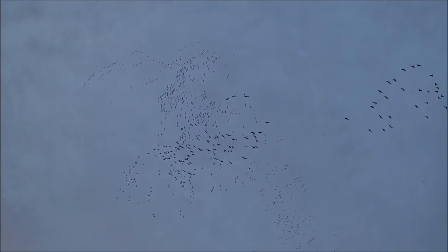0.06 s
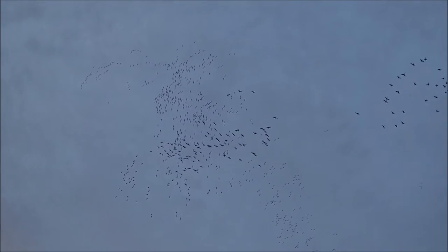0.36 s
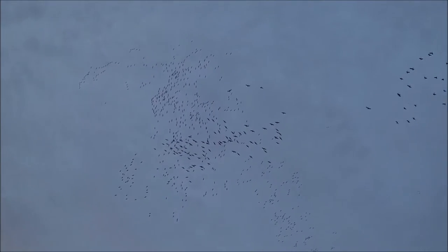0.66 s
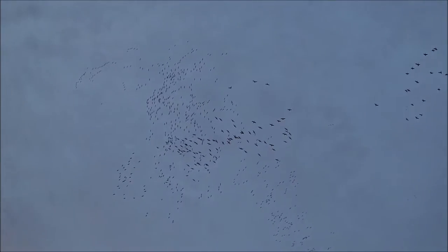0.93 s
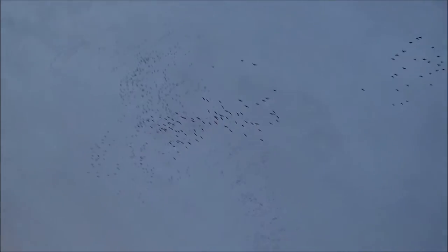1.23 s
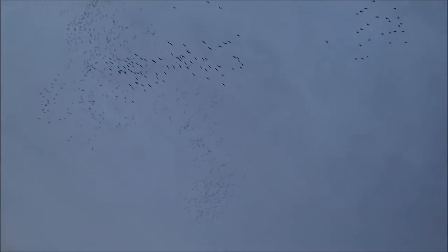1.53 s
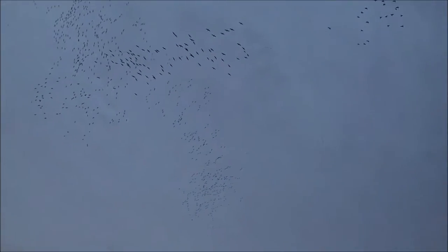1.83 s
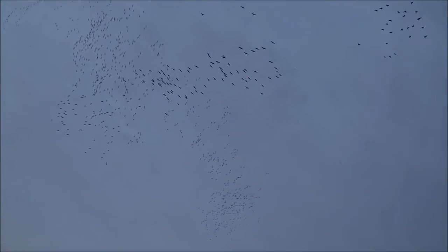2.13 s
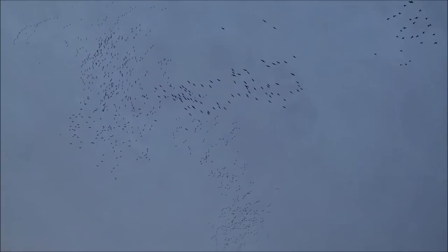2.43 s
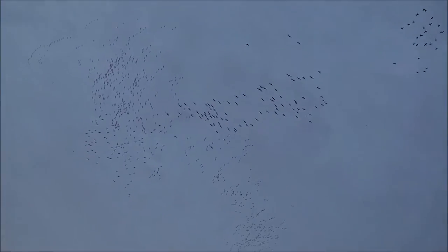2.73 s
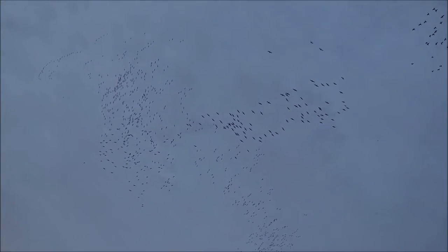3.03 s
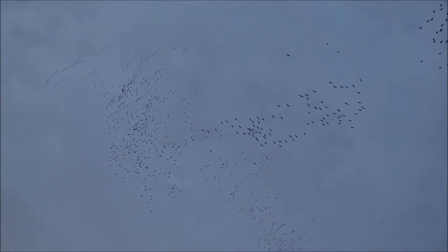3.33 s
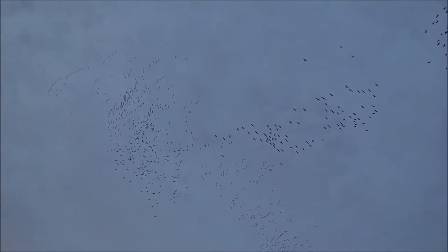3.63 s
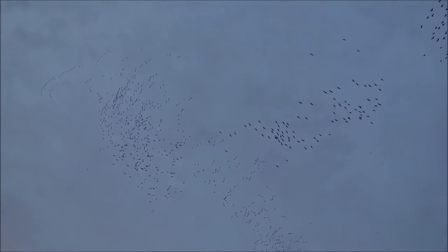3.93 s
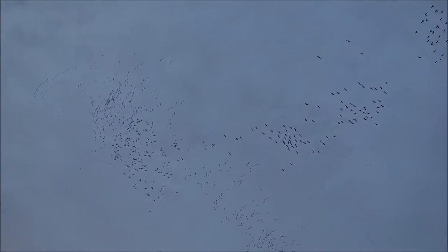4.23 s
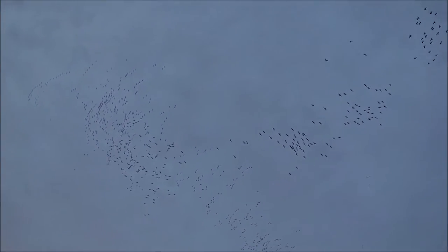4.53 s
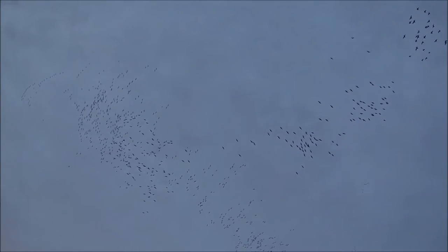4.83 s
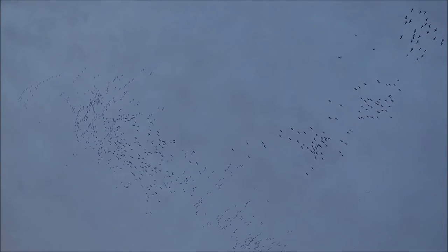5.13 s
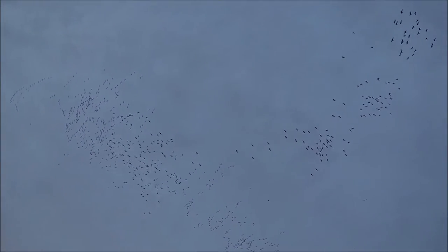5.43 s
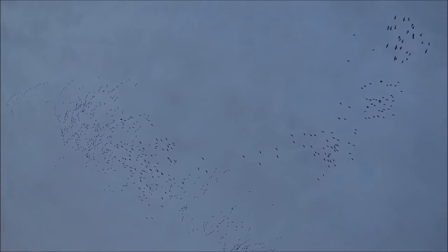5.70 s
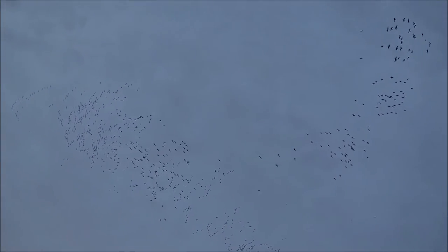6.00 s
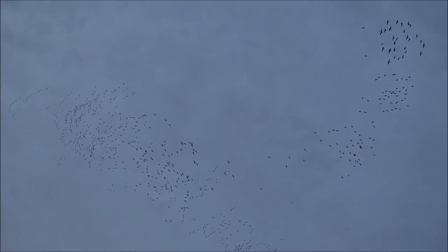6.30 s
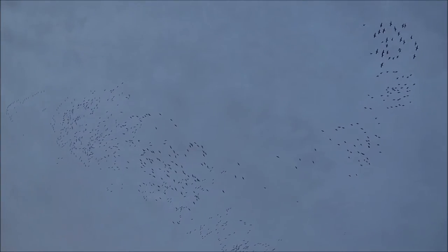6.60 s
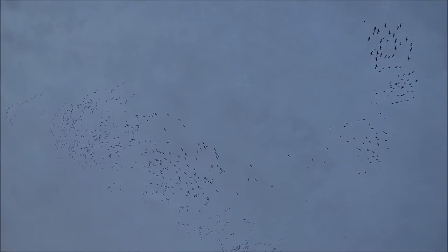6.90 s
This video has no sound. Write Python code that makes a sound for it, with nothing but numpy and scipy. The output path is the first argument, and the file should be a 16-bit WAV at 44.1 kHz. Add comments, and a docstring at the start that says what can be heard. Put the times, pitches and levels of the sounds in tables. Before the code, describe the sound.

A large flock of geese calls high over open country for the whole seven seconds. Hundreds of distant birds, with low and high voices, blur into a dense, flickering chorus. Nearer geese cut through with short, high, arching honks, about ten a second, irregular and often overlapping. Quieter thin yelps, hoarse cackles and harsh squawks are scattered among them, all with a soft, dull echo off the fields. The calling holds a fairly even level and never pauses. Underneath, wind makes a low rumble on the microphone. It buffets hardest from about 1.1 to 1.5 seconds, with smaller gusts near 2.6 seconds, brief bumps at about 3.3 and 4.2 seconds, and a mild gust near 4.7 seconds. After 5 seconds the wind settles to a light rumble while the geese carry on. A very faint hiss and thin electronic whine lie behind everything.

```python
"""A big flock of snow geese passes high over open country, all calling at once.
Each call is the buzz of a syrinx. Hundreds of far birds, low and high voiced, blur into a chorus;
the nearest cut through with thin yelps, short arched honks, hoarse cackles and harsh squawks,
echoing softly off the fields. Wind buffets the microphone, whose electronics hiss and whine
faintly."""
import sys
import numpy as np
from scipy import signal
from scipy.fft import rfft, irfft, next_fast_len
from scipy.io import wavfile
from scipy.ndimage import uniform_filter1d

SR = 44100
rng = np.random.default_rng(int(sys.argv[2]) if len(sys.argv) > 2 else 0)


def master(y):
    """Save y as 16-bit WAV."""
    cut = np.clip(np.atleast_2d(y).T, -1, 1)
    pcm = np.round(cut * 32767)  # scale
    wavfile.write(sys.argv[1], SR, pcm.astype(np.int16))


N = 306936


def from_db(db):
    """Decibels to gain."""
    return 10 ** (np.asarray(db) / 20)


def rms_one(x):
    """Scale to rms 1."""
    return x / np.sqrt(np.mean(x ** 2) + 1e-20)


def fader(curve, trim_db):
    """Gain at every sample from (t/s, level/dB) breakpoints and a trim."""
    times, level_db = np.transpose(curve)
    return from_db(np.interp(np.arange(N) / SR, times, level_db) + trim_db)


def eq(x, curve):
    """Filter by (f/Hz, level/dB) points on a log axis, rolling off steeply past the last."""
    size = next_fast_len(N + SR // 10)
    bins = rfft(x, size)
    hz = np.arange(len(bins)) * SR / size
    point_hz, point_db = np.transpose(curve)
    gain = from_db(np.interp(np.log(np.maximum(hz, 1)), np.log(point_hz), point_db))
    rolloff = np.maximum(hz / point_hz[-1], 1) ** -6
    return irfft(bins * gain * rolloff, size)[:N]


def drift(rate):
    """Smooth random modulator of rms 1, changing about `rate` times a second."""
    pole = np.exp(-40 * np.pi * rate / SR)
    noise = rng.standard_normal(N // 20 + 4002)  # one value per 20 samples
    slow = signal.lfilter([1], [1, -2 * pole, pole * pole], noise)[4000:]
    return np.interp(np.arange(N) / 20, np.arange(len(slow)), rms_one(slow))


def levelled(x, window_s):
    """Hold a sound near rms 1 over the window, keeping its faster flutter."""
    size = max(int(window_s * SR), 2)
    power = uniform_filter1d(uniform_filter1d(x * x, size), size)
    return x / np.sqrt(np.abs(power) + 1e-12)


def arch(start, length, scoop, droop, swell, crest):
    """One call's sample indices, pitch bend (scoops up, then droops) and swelling envelope."""
    first, count = int(start * SR), max(int(length * SR), 2)
    at = np.arange(max(first, 0), min(first + count, N))
    progress = (at - first) / count
    bend = 1 - np.where(progress < .5, scoop, droop) * (2 * progress - 1) ** 2
    effort = np.interp(progress, [0, np.clip(crest, .22, .85), 1], [0, .5, 1])
    return at, bend, np.abs(np.sin(np.pi * effort)) ** swell


def syrinx_crowd(count, pitch_hz, spread_octaves, length_s, bend_share, spread_db, jitter):
    """Pulse trains of many buzzing syrinxes, each call with its own pitch, arch and distance."""
    out, waver = np.zeros(N), 1 + jitter * drift(110)
    for when, scoop, droop, stretch, voice, nearness in rng.random((count, 6)):
        start = when * (N / SR + length_s) - length_s
        at, bend, envelope = arch(start, length_s * (.5 + stretch), 2 * bend_share * scoop,
                                  2 * bend_share * droop, swell=1, crest=.35)
        hz = pitch_hz * 2 ** (spread_octaves * (2 * voice - 1))
        own_waver = waver[at - int(nearness * N)]
        half_phase = np.pi * (np.cumsum(hz * bend * own_waver) / SR + scoop)
        harmonics = int(6500 / hz)
        pulses = np.sin((2 * harmonics + 1) * half_phase) / (np.sin(half_phase) + 1e-12) - 1
        out[at] += from_db(spread_db * nearness ** 2) * envelope * pulses  # few birds are close
    return rms_one(out)


# Tone colour of the distant flock, one EQ per chorus band: f/Hz, level/dB
FUNDAMENTAL_EQ = [(300, -36), (470, -10.5), (560, -11.5), (640, 0), (720, -7), (800, -28.5), (950, -35)]
LOW_VOICES_EQ = [(600, -34.5), (770, -8.5), (850, 1.5), (960, 3.5), (1080, -3), (1270, 6), (1450, -1),
                 (1900, -14.5), (2400, -15.5), (3200, -45.5)]
HIGH_VOICES_EQ = [(500, -41.5), (1100, -30), (1250, 0), (1380, 7), (1480, -6.5), (1600, -12), (1750, -20),
                  (2100, -36), (3000, -60)]
OVERTONE_EQ = [(1450, -36), (1750, -9.5), (1870, 0), (2020, -0.5), (2220, -14), (2400, -6.5), (2650, -25.5),
               (2860, -12), (3100, -42.5), (5000, -70)]
SHRILL_EQ = [(2400, -32), (3000, 1.5), (3200, -7.5), (3420, -3.5), (3650, -4), (4000, -3), (4500, -14),
             (5200, -15.5), (7000, -21.5)]
# Fader rides of the same five bands, before trim: t/s, level/dB
FUNDAMENTAL_RIDE = [(0.0, -57), (0.08, -46.5), (0.13, -46.5), (1.72, -52), (2.19, -46), (2.23, -59.5),
                    (2.79, -50), (4.25, -52.5), (4.3, -48), (4.32, -58), (4.57, -42), (4.73, -44),
                    (5.06, -56), (5.23, -45), (5.27, -52), (6.11, -54.5), (6.57, -58), (6.96, -56.5)]
LOW_RIDE = [(0, -42), (.09, -49), (.35, -50), (.68, -49), (.82, -60), (.88, -44.5), (1.08, -47.5),
            (1.13, -57), (1.3, -46.5), (1.479, -61), (1.6, -50.5), (2.0, -47.5), (2.14, -57), (2.45, -49),
            (2.7, -48.5), (3.05, -51), (3.6, -47.5), (3.95, -56), (4.15, -48), (4.7, -47.5), (4.83, -49),
            (5.0, -48), (5.13, -53), (5.3, -46.5), (5.52, -47), (5.9, -45.5), (6.3, -44.5), (6.47, -49),
            (6.6, -46), (6.96, -49)]
HIGH_RIDE = [(0, -34.5), (.2, -36.5), (.32, -39.5), (.55, -35.5), (.63, -43.5), (.74, -29.5), (.82, -38),
             (.93, -37.5), (1.2, -38), (1.299, -46), (1.4, -31.5), (1.72, -36.5), (1.79, -36.5),
             (1.97, -30.5), (2.02, -32), (2.22, -43), (2.451, -35), (2.51, -40), (2.6, -48), (2.65, -38),
             (2.8, -36), (2.98, -33), (3.12, -35), (3.4, -35), (3.48, -42.5), (3.65, -32), (3.96, -35.5),
             (4.02, -33.5), (4.24, -33), (4.33, -41), (4.411, -37), (4.47, -46), (4.63, -35.5),
             (4.82, -32.5), (4.99, -29.5), (5.06, -37.5), (5.22, -36), (5.4, -34), (5.45, -44), (5.54, -50),
             (5.62, -36.5), (5.83, -32), (5.89, -48), (5.98, -35.5), (6.1, -33), (6.2, -35), (6.3, -35.5),
             (6.39, -37), (6.52, -33.5), (6.739, -32), (6.8, -40.5), (6.96, -24.5)]
OVERTONE_RIDE = [(0.0, -49), (0.35, -48.5), (0.73, -53), (0.91, -50), (2.02, -48.5), (2.13, -49),
                 (2.25, -51.5), (2.52, -49.5), (2.66, -49), (2.87, -51), (3.04, -47.5), (3.16, -49),
                 (3.37, -52.5), (3.59, -51), (3.76, -46.5), (3.99, -49.5), (4.19, -49.5), (4.48, -48.5),
                 (4.81, -43.5), (4.98, -47.5), (5.43, -50), (5.68, -53.5), (6.45, -47), (6.65, -54.5),
                 (6.78, -46.5), (6.96, -49)]
SHRILL_RIDE = [(0.04, -60), (0.76, -63), (0.942, -59), (0.96, -63), (1.588, -64), (2.52, -64),
               (2.58, -60.5), (2.66, -67.5), (3.21, -59), (3.48, -70), (3.56, -62.5), (4.97, -59.5),
               (5.051, -70), (5.28, -63), (5.9, -64.5), (5.939, -67), (6.04, -65), (6.9, -62)]


def distant_chorus():
    """The bed: low calls, and high calls from fundamental to shrill top, each band on its own fader."""
    def band(calls, colour, wash, window_s):
        """Separate calls over the noise wash of the farthest birds, in one tone colour."""
        return levelled(eq(calls + wash * rng.standard_normal(N), colour), window_s)

    low = syrinx_crowd(count=280, pitch_hz=403.5, spread_octaves=.42, length_s=.11,
                       bend_share=.072, spread_db=14, jitter=.013)
    high = syrinx_crowd(count=420, pitch_hz=708, spread_octaves=.38, length_s=.09,
                        bend_share=.08074, spread_db=6.5, jitter=.0062)
    return (fader(FUNDAMENTAL_RIDE, trim_db=-2) * band(high, FUNDAMENTAL_EQ, wash=.6, window_s=.092)
            + fader(LOW_RIDE, trim_db=5) * band(low, LOW_VOICES_EQ, wash=.6, window_s=.1)
            + fader(HIGH_RIDE, trim_db=-3) * band(high, HIGH_VOICES_EQ, wash=.35, window_s=.093)
            + fader(OVERTONE_RIDE, trim_db=-2.5) * band(high, OVERTONE_EQ, wash=.35, window_s=.09)
            + fader(SHRILL_RIDE, trim_db=-7) * band(high, SHRILL_EQ, wash=1, window_s=.42))


# Spectra of small eddies (rumble) and big, slow ones (buffet): f/Hz, relative level/dB
RUMBLE_EQ = [(15, -8), (45, 3.5), (68, -1), (80, -9), (115, -17), (160, -34), (300, -39.5)]
BUFFET_EQ = [(8, -3), (18, 10), (30, -3), (48, -16), (70, -31), (150, -56)]
# Gusts over the steady breeze: t/s, hold/s, big-eddy level/dB, small-eddy level/dB
GUSTS = [(0.064, 0.2, -1.5, 5), (1.117, 0.13, 22.5, 9), (1.349, 0.064, 18, 2), (1.46, 0.046, 18, 2.5),
         (1.75, 0.037, 9.5, -5), (1.926, .03, 9.5, 0.5), (2.61, 0.23, 6, 3), (3.309, 0.011, 14, 9.5),
         (3.81, 0.43, 3.5, 1.5), (4.237, 0.017, 13, 13.5), (4.684, 0.29, 7, 2.5)]


def wind():
    """Eddies rumble on the microphone port; in strong gusts the big, slow ones tend to grow most."""
    attack_s, release_s = .038, .092
    t = np.arange(N) / SR
    big_db, small_db = np.zeros(N), np.zeros(N)
    for start, hold, big_peak_db, small_peak_db in GUSTS:
        envelope = np.interp(t - start, [-attack_s, 0, hold, hold + release_s], [0, 1, 1, 0])
        big_db = np.maximum(big_db, big_peak_db * envelope)
        small_db = np.maximum(small_db, small_peak_db * envelope)
    rumble = levelled(eq(rng.standard_normal(N), RUMBLE_EQ), window_s=.31)
    buffet = levelled(eq(rng.standard_normal(N), BUFFET_EQ), window_s=.08)
    return from_db(small_db - 45) * rumble + from_db(big_db - 41) * buffet


# Noise floor of open air and microphone: f/Hz, level/dB per Hz
HISS_EQ = [(60, -84.5), (200, -88), (290, -91.5), (360, -88), (470, -92.5), (1500, -100), (4000, -112),
           (7000, -116), (8700, -113), (10800, -121), (11400, -115), (12300, -113), (13700, -125),
           (15000, -122)]
# Tones of the electronics: f/Hz, rms level/dB
WHINE_TONES = [(12258, -84), (12288, -84.5), (11400, -101), (5660, -97)]


def hiss_and_whine():
    """Open air and microphone hiss, with the thin wavering whine of the electronics."""
    out = eq(rng.standard_normal(N), HISS_EQ) * np.sqrt(SR / 2)
    for hz, level_db in WHINE_TONES:
        phase = 2 * np.pi * np.cumsum(hz + 4 * drift(13)) / SR
        out += from_db(level_db) * np.sqrt(2) * np.sin(phase)
    return out


# Thin, shrill yelps: t/s, length/s, top f/Hz, arch/share of pitch,
# then relative level/dB of the body (harmonics 1-4), of harmonic 5 and of harmonic 6
YELPS = [(0.06, 0.125, 850, 0.12, -51.5, -64, -74), (0.411, 0.18, 867, 0.09, -53, -66, -77),
         (0.794, 0.15, 838, 0.14, -46.5, -62.5, -77), (1.393, 0.13, 864, 0.13, -53, -69, -75),
         (1.53, 0.087, 858, 0.042, -43.5, -67.0, -83.0), (1.599, 0.11, 842.0, 0.11, -53, -61.0, -78.5),
         (1.906, 0.14, 846, 0.14, -62, -72, -83.5), (2.266, 0.12, 841, 0.11, -50.5, -62, -78.5),
         (3.15, 0.15, 876, 0.09, -55, -67.5, -83.0), (3.16, 0.22, 797, 0.094, -60, -75, -72.5),
         (3.781, 0.14, 864, 0.17, -49, -74.5, -74), (4.43, 0.081, 844, 0.084, -47.5, -81, -86),
         (4.696, 0.19, 849, 0.09, -55, -68, -79), (5.279, 0.15, 857, 0.15, -52.5, -64.5, -79.0),
         (5.602, 0.088, 805, 0.13, -63, -71.0, -70), (6.537, 0.117, 871.0, 0.12, -56, -63.5, -71)]
# Harmonics 1-4 against the yelp's body: level/dB
YELP_BODY_DB = [-2, 1, -1, -16]


def yelps():
    """High voices: low harmonics sound near the top of the pitch arch, shrill ones trace all of it."""
    out, waver = np.zeros(N), 1 + .008 * drift(30)
    flutter_db = np.array([4 * drift(50) for _ in range(6)])
    grit = np.array([.12 * drift(160) for _ in range(6)])  # uneven cycles smear the top most
    harmonic = np.arange(1, 7)[:, None]
    swell = np.where(harmonic <= 4, .9, .5)
    for start, length, top_hz, arch_share, body_db, fifth_db, sixth_db in YELPS:
        at, bend, envelope = arch(start, length, arch_share, arch_share, swell=.68, crest=.55)
        levels_db = np.array([*(body_db + np.array(YELP_BODY_DB)), fifth_db, sixth_db])[:, None]
        gains = from_db(levels_db + flutter_db[:, at]) * envelope ** swell
        phase = 2 * np.pi * np.cumsum(top_hz * bend * waver[at]) / SR
        out[at] += np.sum(gains * np.sin(harmonic * (phase + grit[:, at])), axis=0)
    return out


# The nearest honks: t/s, length/s, top f/Hz, upward tilt of the arch/share of pitch,
# relative level/dB of harmonics 2, 3, 4 and 5, crest of the swell/share of length
HONKS = [(0.061, 0.077, 679.0, -0.1, -29.5, -49, -69, -80.0, 0.18),
         (0.105, 0.14, 654.6, -0.0019, -31, -57, -71, -80.0, 0.15),
         (0.26, 0.04, 699, 0.051, -32, -48.0, -70.0, -80.0, 0.15),
         (0.353, 0.047, 694.0, 0.083, -37.5, -54, -67, -80.0, 0.84),
         (0.51, 0.11, 696.0, 0.024, -33.5, -56, -69, -84, 0.15),
         (0.681, 0.119, 644.0, -0.05, -31.5, -41, -59, -76, 0.54),
         (0.852, 0.073, 702, 0.058, -30, -58.0, -58, -70, 0.17),
         (0.938, 0.045, 673, 0.04, -38, -50, -70.0, -81, 0.15),
         (0.99, 0.06, 670, 0.045, -50, -38, -70.0, -79.0, 0.85),
         (1.052, 0.031, 659, 0.057, -28, -45, -64, -79, 0.15),
         (1.089, 0.094, 679, 0.076, -30.5, -41.5, -71, -78, 0.15),
         (1.261, 0.098, 672, -0.045, -35, -41, -69, -79, 0.42),
         (1.434, 0.13, 701, -0.077, -24.5, -38.5, -64, -63, 0.47),
         (1.603, 0.046, 696.0, 0.052, -22.0, -62, -76, -74, 0.15),
         (1.653, 0.033, 667, -0.0039, -30.5, -51.0, -71, -72, 0.26),
         (1.807, 0.057, 703, -0.043, -24.5, -42, -53.5, -66, 0.48),
         (1.866, 0.082, 657, -0.01, -42, -36.0, -55, -79, 0.53),
         (1.922, 0.068, 735, 0.076, -30.0, -60, -64, -82, 0.15),
         (2.027, 0.11, 702, -0.09, -30, -39, -62.0, -70, 0.91),
         (2.094, 0.13, 687.5, -0.065, -24, -51, -62, -81, 0.82),
         (2.124, 0.073, 687.0, 0.035, -36.5, -42, -70.0, -61, 0.15),
         (2.279, 0.081, 960, -0.078, -34.5, -57, -70.0, -77, 0.13),
         (2.37, 0.044, 722, 0.086, -28, -43.0, -58.0, -69, 0.15),
         (2.42, 0.093, 740, -0.09, -37.0, -41.5, -66.0, -71, 0.46),
         (2.529, 0.11, 702, 0.039, -31.5, -41, -52, -70.0, 0.69),
         (2.64, 0.056, 690, -0.04, -39, -58.0, -63, -84, 0.15),
         (2.756, 0.027, 640, -0.02, -28.5, -47.5, -55, -80, 0.15),
         (2.831, 0.084, 676, 0.016, -24, -41.5, -71, -64.5, 0.4),
         (2.894, 0.114, 698.5, -0.1, -31, -39.5, -56.5, -81, 0.7),
         (2.979, 0.078, 708, -0.028, -33.5, -53, -59, -81, 0.15),
         (3.043, 0.091, 681, 0.048, -30, -38.5, -72, -60.0, 0.44),
         (3.144, 0.037, 666.4, 0.059, -21, -58.0, -66, -61.5, 0.8),
         (3.187, 0.069, 662, -0.07, -34.5, -44.5, -72, -70.5, 0.15),
         (3.287, 0.054, 696.0, 0.09, -26.0, -49, -63, -81, 0.84),
         (3.326, 0.13, 634, -0.079, -30, -50.0, -69, -74, 0.84),
         (3.502, 0.038, 638, -0.094, -28.5, -55, -70.0, -77.0, 0.85),
         (3.576, 0.032, 704.0, 0.083, -26.5, -51, -62, -67, 0.5),
         (3.612, 0.068, 659, -0.018, -31.5, -44, -65.0, -63, 0.15),
         (3.739, 0.035, 669, 0.013, -22, -42.5, -70.0, -78, 0.84),
         (3.79, 0.09, 692.0, -0.08, -31, -40.5, -57, -65, 0.16),
         (3.864, 0.055, 689, -0.047, -24, -55, -66, -74.0, 0.29),
         (3.937, 0.05, 736.5, -0.032, -35, -41, -64.0, -73, 0.16),
         (4.028, 0.07, 697.6, 0.078, -28, -36.5, -53.5, -81, 0.15),
         (4.09, 0.074, 679, -0.061, -29.5, -36.0, -58, -79, 0.16),
         (4.157, 0.025, 677.4, 0.038, -24, -41, -56, -79, 0.85),
         (4.211, 0.13, 755, -0.047, -34.5, -46.5, -61, -78, 0.16),
         (4.347, 0.1, 685.0, 0.051, -34, -44, -65, -80.0, 0.96),
         (4.493, 0.052, 689.0, 0.018, -44.0, -52, -66, -65, 0.14),
         (4.661, 0.085, 651, -0.012, -43.5, -36, -68, -75, 0.26),
         (4.648, 0.136, 623, 0.038, -38.5, -56, -72, -66.5, 0.28),
         (4.742, 0.14, 691, 0.089, -28.0, -49, -60, -72, 0.32),
         (4.862, 0.182, 679.0, -0.02, -28, -46, -69.0, -69, 0.52),
         (5.062, 0.14, 710, 0.03, -29, -40, -57.0, -83, 0.48),
         (5.172, 0.091, 704, 0.063, -30.5, -58.0, -66.0, -80.0, 0.85),
         (5.195, 0.046, 640, 0.016, -29.5, -55, -71, -80.0, 0.85),
         (5.256, 0.043, 692, -0.096, -23, -51, -60, -68, 0.85),
         (5.291, 0.041, 632, -0.031, -27.5, -50.5, -72, -70, 0.15),
         (5.351, 0.071, 650.0, 0.02, -31, -49, -67, -71.0, 0.73),
         (5.562, 0.079, 678.6, -0.041, -32.5, -56, -70.0, -70, 0.78),
         (5.7, 0.12, 623.6, -0.048, -35, -52, -50, -79, 1),
         (5.78, 0.092, 651, 0.01, -39.5, -38, -71, -80.0, 0.69),
         (5.924, 0.085, 754, 0.034, -35, -44.5, -56, -71, 0.15),
         (6.064, 0.13, 699, 0.053, -30, -46.5, -64, -64.0, 0.78),
         (6.146, 0.074, 635, 0.023, -33.5, -41, -59, -71, 0.15),
         (6.253, 0.037, 704, 0.093, -37.0, -47, -66, -87, 1),
         (6.414, 0.029, 666, 0.038, -23, -35.0, -60, -80.0, 0.24),
         (6.428, 0.14, 696, -0.1, -24.5, -39, -67, -76, 1),
         (6.632, 0.042, 628, -0.072, -28, -64, -67, -70, 0.16),
         (6.714, 0.064, 681.4, 0.049, -27.0, -61, -72, -83, 0.15),
         (6.826, 0.053, 690, 0.046, -28, -47, -70.0, -84, 0.12),
         (6.9, 0.071, 673, -0.1, -28, -55, -68, -65, 0.76)]


def honks():
    """Almost clean stacks: harmonic 2, in the windpipe's resonance, speaks first; the rest swell in."""
    attack_s, hold_share, sag = .01, .77, .9
    usual_hz, usual_length_s = 685, .0797
    out, waver = np.zeros(N), 1 + .0055 * drift(65)
    flutter_db = [1.7 * drift(44) for _ in range(4)]  # turbulent air on the way down
    grit = [.13 * drift(110) for _ in range(4)]  # uneven syrinx cycles roughen the phase
    for start, length, top_hz, tilt, second_db, third_db, fourth_db, fifth_db, crest in HONKS:
        arch_share = .0725 * (length / usual_length_s) ** .4  # longer honks arch more
        at, bend, swelling = arch(start, length, arch_share + tilt, arch_share - tilt,
                                  swell=.8, crest=crest)
        release_at_s = max(attack_s, hold_share * length)
        punchy = np.interp(at / SR - start, [0, attack_s, release_at_s, length], [0, 1, sag, 0])
        phase = 2 * np.pi * (np.cumsum(top_hz * bend * waver[at]) / SR + rng.random())
        # the weak fundamental grows as it nears the windpipe's resonance
        first_db = second_db - 25.5 + 44 * np.log2(top_hz / usual_hz)
        upper_db = fifth_db - 8.5 * np.arange(3)  # harmonics 5-7
        for k, level_db in enumerate([first_db, second_db, third_db, fourth_db, *upper_db]):
            hoarseness = max(k, .7) ** .9  # higher harmonics are rougher
            flutter_depth = min(k + 1, 4) / 2
            tone = np.sin((k + 1) * phase + hoarseness * grit[k % 4][at])
            envelope = punchy if k == 1 else swelling
            out[at] += from_db(level_db + flutter_depth * flutter_db[k % 4][at]) * envelope * tone
    return out


def duck_under(key, depth_db, knee_db, window_s):
    """Sidechain gain that dips briefly while the key signal is loud."""
    power = np.abs(uniform_filter1d(key ** 2, int(window_s * SR)))
    return from_db(depth_db * power / (power + from_db(2 * knee_db)))


# Cackles of low birds, squawks of higher ones: t/s, length/s, top f/Hz, relative level/dB
CACKLES = [(0.093, .16, 490, -39), (0.538, 0.055, 475, -38), (0.935, 0.14, 465, -55),
           (1.22, .1, 480.7, -38), (1.331, 0.1, 482, -38), (1.527, 0.058, 508, -42.5),
           (2.341, 0.053, 438, -37.5), (2.522, 0.093, 414, -38), (3.135, 0.025, 488, -42.5),
           (3.213, 0.07, 472, -54), (3.3, .13, 437.4, -56), (3.497, 0.14, 471, -42),
           (3.675, 0.087, 462, -43), (4.415, 0.046, 488.4, -55), (4.487, 0.071, 488, -38.5),
           (4.598, 0.055, 492.4, -40), (4.903, 0.059, 456, -47), (5.592, 0.048, 435.5, -44),
           (5.7, 0.095, 432, -35), (5.788, 0.094, 473, -41), (5.95, 0.05, 416, -41.5),
           (6.046, 0.073, 445, -35.5), (6.17, .15, 487.5, -41.5), (6.635, .045, 462, -40),
           (6.69, .085, 485.2, -36.5), (6.818, 0.083, 489, -36.5)]
SQUAWKS = [(.1, 0.17, 543, -38), (.275, 0.068, 551.5, -37.5), (.445, 0.062, 573, -43),
           (.71, 0.086, 564, -41), (.895, 0.11, 530, -44), (1.065, 0.07, 561, -40), (1.67, .1, 544, -36.5),
           (1.795, 0.11, 610, -38.5), (1.915, 0.093, 551, -42.5), (2.28, 0.099, 539, -42.5),
           (2.355, 0.076, 539, -38), (2.73, 0.06, 550, -49), (3.05, 0.13, 571, -46),
           (3.16, 0.072, 547, -36.5), (3.36, 0.087, 540, -37.5), (3.525, 0.1, 550, -36.5),
           (3.69, 0.2, 556, -38.5), (4.22, 0.11, 527, -46.5), (4.93, 0.12, 539, -44),
           (5.185, 0.091, 520, -39), (5.365, 0.053, 540, -36.5), (5.57, 0.093, 541, -38.5),
           (5.94, 0.033, 511, -50), (6.025, 0.022, 539, -40), (6.125, 0.065, 559, -42),
           (6.875, 0.056, 520, -41)]
# Tone colour of the squawks: f/Hz, level/dB
SQUAWK_EQ = [(500, -22), (900, -12), (1150, -16), (1400, 8), (1620, -1), (1850, -5), (2150, -17),
             (2500, -21.5), (3100, -36.5), (4000, -33.5), (5000, -47)]


def hoarse_calls(calls, colour, bend_share, jitter, rasp, swell, breath, rattle):
    """An uneven, hissing syrinx buzz that rattles every few cycles, swelling with each call."""
    buzz, level = np.zeros(N), np.zeros(N)
    waver, grit = 1 + jitter * drift(120), 1 + rasp * drift(200)
    rattle_hz = 120 * (1 + .25 * drift(25))
    throb = 1 + rattle * np.sin(2 * np.pi * np.cumsum(rattle_hz) / SR)
    for start, length, top_hz, level_db in calls:
        at, bend, envelope = arch(start, length, bend_share, bend_share, swell, crest=.47)
        phase = 2 * np.pi * np.cumsum(top_hz * bend * waver[at]) / SR
        buzz[at] += np.cos(np.arange(1, 7)[:, None] * phase).sum(axis=0)
        level[at] += from_db(level_db) * envelope
    voice = eq(grit * buzz + breath * rng.standard_normal(N), colour)
    return level * throb * levelled(voice, window_s=.0062)


# Reflections off the ground: delay/s, level/dB
ECHO_TAPS = [(0.01, -13.5), (0.031, -15), (0.073, -13.5)]


def ground_echoes(x):
    """The fields send back a few soft, dull copies of the calls."""
    dull = signal.sosfilt(signal.butter(1, 2500, fs=SR, output="sos"), x)
    n = np.arange(N)
    return sum(from_db(db) * np.interp(n - delay * SR, n, dull, left=0) for delay, db in ECHO_TAPS)


def scene():
    """Mono mix: near calls and their echoes over the chorus, wind and noise floor."""
    honking = from_db(-1.5) * honks()
    yelping = from_db(-3.5) * yelps()
    cackling = from_db(-.9) * hoarse_calls(CACKLES, LOW_VOICES_EQ, bend_share=.07, jitter=.018,
                                           rasp=.5, swell=.6, breath=2.5, rattle=.55)
    squawking = from_db(-3) * hoarse_calls(SQUAWKS, SQUAWK_EQ, bend_share=.08, jitter=.02,
                                           rasp=.6, swell=.8, breath=3, rattle=.4)
    near = honking + yelping + cackling + squawking
    ducking = duck_under(honking, depth_db=-7.5, knee_db=-25, window_s=.051)
    far = from_db(.44) * distant_chorus() * ducking
    return (near + ground_echoes(near) + far + wind() + hiss_and_whine())[None]


def record(dry):
    """A steep high cut on the whole mix."""
    cutoff_hz = 15200
    return signal.sosfilt(signal.ellip(10, .1, 80, cutoff_hz, fs=SR, output="sos"), dry)


dry = scene()
out = record(dry)
master(out)
```